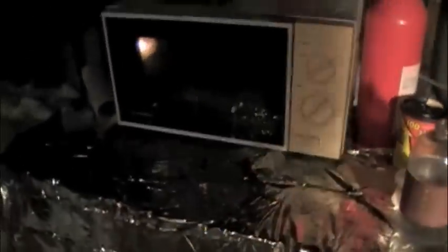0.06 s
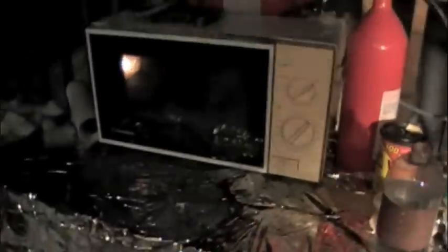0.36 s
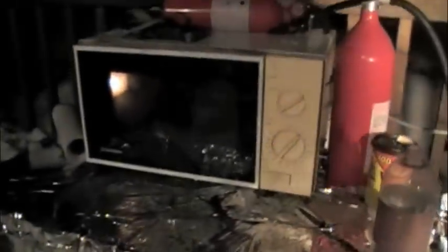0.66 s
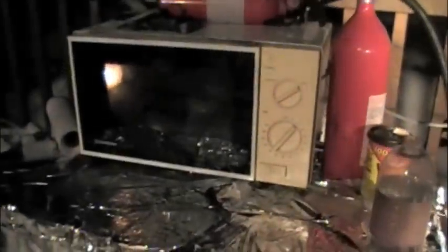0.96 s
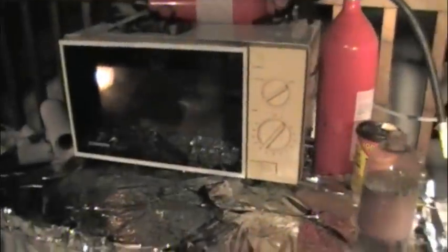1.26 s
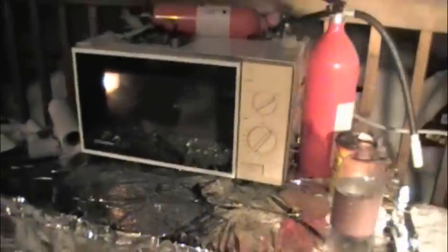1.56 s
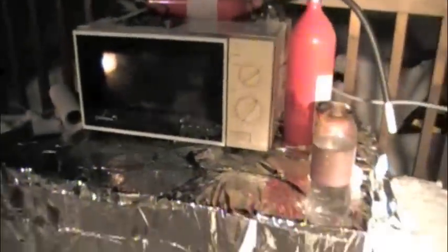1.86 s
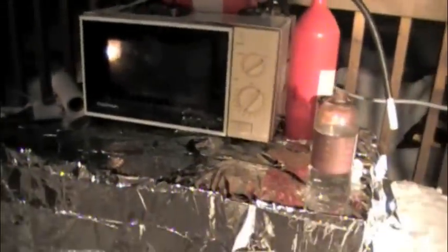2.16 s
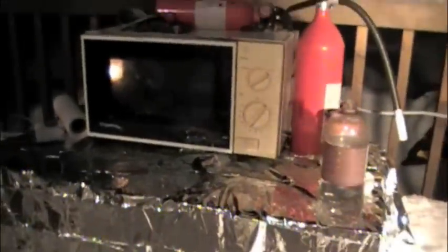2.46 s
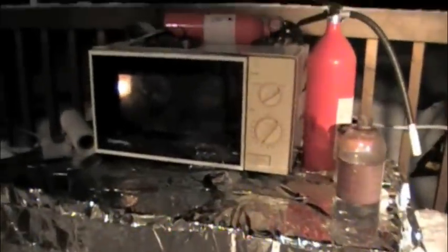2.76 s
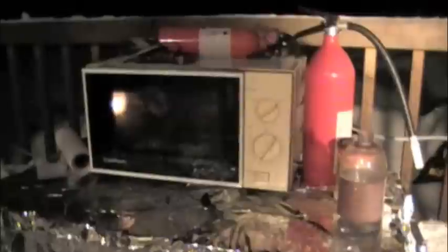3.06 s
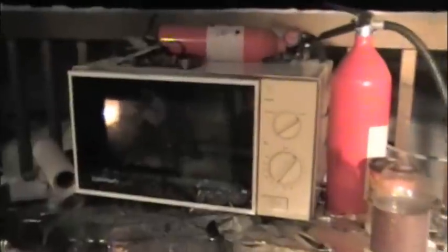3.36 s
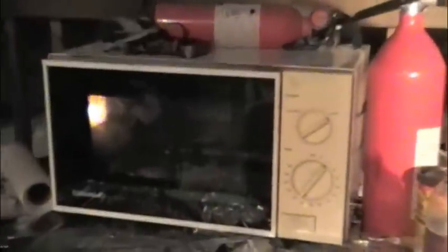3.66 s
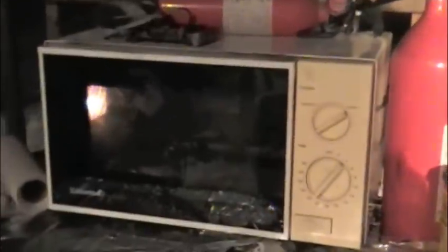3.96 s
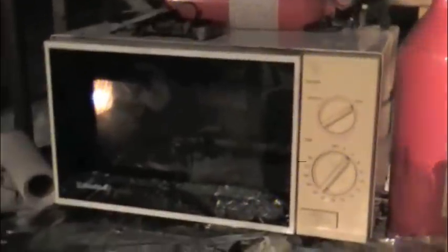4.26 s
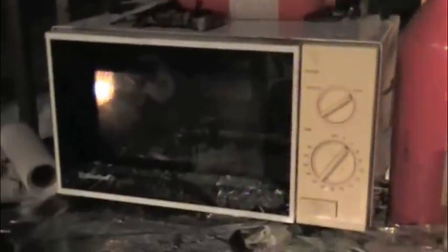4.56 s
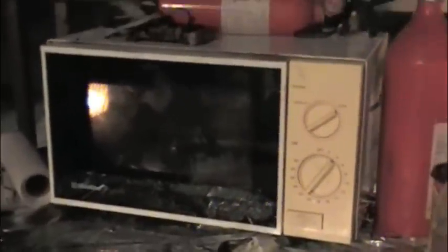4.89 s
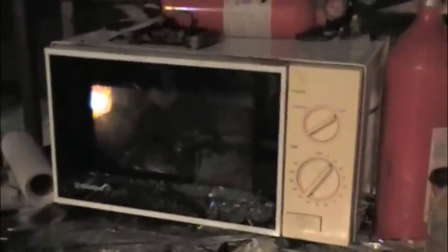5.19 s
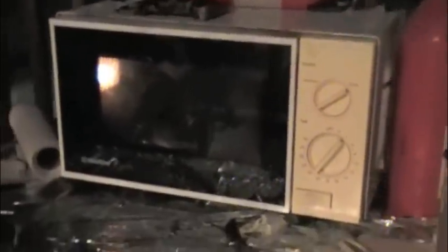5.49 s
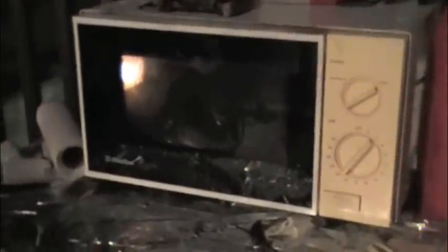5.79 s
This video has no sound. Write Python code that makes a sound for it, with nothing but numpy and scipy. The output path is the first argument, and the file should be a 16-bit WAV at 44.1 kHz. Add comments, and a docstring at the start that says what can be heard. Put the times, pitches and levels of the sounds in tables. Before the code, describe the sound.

A microwave oven runs close by in a small room for six seconds, with a steady low mains hum, an airy fan rush and a very faint whine. Right at the start, a few short electric sparks spit inside it, followed by a puff of hiss and light crackles of burning plastic. From about 0.9 to 2.6 seconds, arcing sizzles in buzzing, slightly metallic spells, with a cluster of sharp cracks and a ping at 1.2. Brief sparks flare between 2.8 and 3.2, while a faint squeal rises and falls. More sizzling comes at 3.5, ending in a bright snap at 3.8, and returns from 4.2 to 4.7. Cracks and hollow knocks gather from 4.9, building to the loudest, densest pops, crackles and pings between 5.5 and 5.8, then die back to the hum.

```python
"""Phone burning in a microwave oven

An old oven hums at mains harmonics; its fan whines and blows air through the vents.
An arc pulses with the magnetron at mains rate, hisses, flares and rings in the steel cavity.
The burning casing crackles, puffs, knocks, cracks, pings and faintly squeals in a small room,
most violently near the end."""
import sys
import numpy as np
from scipy import signal
from scipy.fft import rfft, irfft, next_fast_len
from scipy.io import wavfile
from scipy.ndimage import uniform_filter1d, map_coordinates

SR = 44100
rng = np.random.default_rng(int(sys.argv[2]) if len(sys.argv) > 2 else 0)


def unload_audio(sound):
    """Save the sound as a 16-bit wav file, at the path given as the first command line argument."""
    columns = np.transpose(np.atleast_2d(sound))
    # keep every value between -1 and 1, then stretch to whole-number steps
    steps = np.round(np.clip(columns, -1, 1) * 32767)
    wavfile.write(sys.argv[1], SR, steps.astype(np.int16))


N = 266143
TIME_S = np.arange(N) / SR
COARSE_S = TIME_S[::32]

# Oven loudness as the listener moves. Each row: time in seconds, relative hum and fan rumble in dB.
OVEN_LEVELS = [(0, -55, -55), (.8, -54, -61), (1.5, -54, -56), (2.1, -53.5, -65.5), (3.1, -53, -60),
               (3.6, -54.5, -61.5), (4.2, -54, -61.5), (4.8, -53, -61), (5.3, -52, -58.5), (6, -51, -57)]
# Transformer and panel hum. Each row: mains harmonic number, relative level in dB.
HUM_PARTIALS = [(1, -41.5), (2, -17.5), (3, -26.5), (4, -21), (6, -16), (8, -2.5), (10, -23), (12, -12),
                (14, -28), (18, -21), (26, -19.5)]
# Hum partials that form standing waves. Each entry: mains harmonic number.
STANDING_HARMONICS = [2, 4, 6, 12]
# Path through the standing waves. Each row: time in seconds, then gain in dB of each such harmonic.
STANDING_GAINS = [(0, -2, 7, 6, -5), (.9, 0.5, 12, 8.5, -4), (1.45, 3, 7.5, 7, -2), (2, -1, -2.5, -4, 0.5),
                  (3, 1.5, -4, -7, -1.5), (3.6, 4, 4, -16, -5), (4.3, 1, 0, 3.5, 0), (5.1, -1, -2, -2, 3),
                  (5.65, -4.5, 5, 4, 5), (6.03, -4, -2, 0, 1)]
# Fan rumble and vent air spectra. Each row: frequency in Hz, gain in dB.
RUMBLE_SPECTRUM = [(25, -57), (55, -41), (100, -14), (170, -12), (228, -0.5), (290, -5), (370, 0.5),
                   (470, -11.5), (800, -13), (1600, -41.5)]
AIR_SPECTRUM = [(30, -62), (100, -25), (250, -5.5), (420, 2.5), (680, 0.5), (950, -2.5), (1550, -5.5),
                (2000, -8.5), (2550, -7), (3000, -13), (4200, -13), (6500, -17.5), (8600, -19.5),
                (11000, -27), (16000, -55)]
# Vent resonances. Each row: centre in Hz, width in Hz, relative height in dB.
VENT_MODES = [(632, 19, 7.5), (832, 77, 7.5), (1200, 12, -13), (1467, 33, 12.5), (1840, 110, -6),
              (2080, 35, -30)]
# Stereo likeness of the fan noise. Each row: frequency in Hz, coherence from 0 to 1.
FAN_COHERENCE = [(60, 0.17), (150, 0.53), (380, 0.79), (950, 0.46), (2380, 0.58), (5980, 0.69),
                 (15000, 0.16)]
# Spells of arcing. Each row: start and end in seconds, relative level in dB, rise in seconds, sag in
# dB per second, treble, mains pulsing and frying pops in dB, low, middle and top ring in Hz,
# the three ring gains in dB, notch in Hz.
ARC_SPELLS = [(0.855, 1.07, -40.5, 0.0086, 34, 5, 5.5, 14, 1760, 2760, 7250, 1, 0, -8, 3200),
              (1.123, 1.43, -46.5, .016, 46, 1.5, 8, 21, 1820, 7300, 8400, -1, -6, -6, 6400),
              (1.423, 1.857, -47.5, .23, 30, 3, 4.5, 20.5, 1760, 5000, 8100, -14, -2, -3, 6500),
              (1.861, 2.6, -51.5, .01, 28.5, 1.5, 7, 26.5, 1800, 6000, 9200, -12, -15, -9, 7160),
              (3.498, 3.757, -50, .004, 10, 5.5, 7, 18, 1800, 7350, 8800, -5, 0, -7, 6700),
              (3.511, 3.76, -49, 0.1, 60, 6, 8, 17, 2090, 5900, 8800, 6, 2, 6, 3080),
              (4.202, 4.653, -45.5, .11, 25, -1.5, 5, 21, 1850, 2200, 8200, -2, -5, -17, 3230),
              (4.694, 5.137, -56, .01, -16, -1.5, 12, 18, 1800, 5200, 8400, -16, -19, -12, 7000)]
# Sudden arc flares. Each row: start in seconds, relative level and treble in dB, low, middle and top
# ring in Hz, the three ring gains in dB, notch in Hz.
ARC_FLARES = [(.002, -30.5, -11, 1800, 5750, 8300, -5, -5, -5.5, 4200),
              (0.0791, -28, 3, 1840, 5600, 8600, 6.5, 1, -3, 4250),
              (0.0963, -27.5, 1.5, 2030, 7200, 8300, -1, 0, -13, 4200),
              (.163, -31, 2.5, 1900, 6300, 8650, -6, -4, -1, 4750),
              (1.064, -35, -1.5, 1730, 5800, 8300, -3, -4, -8, 3250),
              (1.1128, -35, -1, 1750, 7400, 8400, -4, -2, -9, 6400),
              (1.78, -34, -2, 1750, 7740, 8400, -4, -5, -11, 6400),
              (2.381, -37.5, -1, 1830, 5850, 6900, 1, 4, -10, 8400),
              (2.7977, -24.5, -14.5, 1780, 4460, 8100, 1, -16, 9.5, 3200),
              (2.828, -33.5, -1.5, 1770, 7500, 8500, 1, -4, 0, 3200),
              (2.93, -27.5, 2, 1800, 2850, 8800, -2, -1, -3, 6940),
              (3.2132, -26.5, -6.5, 1750, 5500, 8700, 6.5, 0, 5, 7000)]
# Arc hiss spectrum. Each row: frequency in Hz, gain in dB.
HISS_SPECTRUM = [(30, -43), (100, -17), (500, -4), (850, -12), (1150, -2), (2300, -4), (3300, -7),
                 (5500, -2.5), (8800, -1.5), (10000, -8.5), (12500, -14.5), (14000, -20), (16000, -44)]
# Steel cavity resonances. Each row: centre in Hz, width in Hz, relative height in dB.
CAVITY_MODES = [(1020, 93, 4.5), (1217, 65, 3), (1466, 62, 2.5), (1756, 165, 6.5), (2117, 85, 3.5),
                (2680, 190, -1.5), (5680, 560, -14), (8170, 630, -13)]
# Cavity reverberation. Each row: frequency in Hz, T60 in seconds.
CAVITY_DECAY = [(500, 0.12), (2000, 0.13), (8000, 0.11), (14000, 0.061)]
# Crackle spectrum of burning plastic. Each row: frequency in Hz, gain in dB.
PLASTIC_SPECTRUM = [(30, -54), (80, -12), (250, -16.5), (550, -0.5), (1000, 1), (2000, 1), (2700, -5),
                    (5000, -10), (8500, -8.5), (12000, -16), (16000, -59)]
# Dull smouldering. Each row: time in seconds, relative level in dB.
SMOULDER_LEVELS = [(.2, -55), (.52, -54.5), (.95, -59.5), (1.6, -51.5), (2.05, -68), (4.3, -78),
                   (4.85, -55.5), (6, -57)]
# Crackle flurries. Each row: peak time in seconds, relative level in dB, length in seconds, treble in dB.
CRACKLE_FLURRIES = [(0.236, -43.5, 0.03, 3), (0.29, -56, 0.14, 0), (0.315, -44.5, 0.073, -3),
                    (1.439, -48.5, 0.04, -3), (1.544, -47, 0.16, -1.5), (1.714, -45, 0.14, -11),
                    (4.373, -52, 0.057, -11), (4.958, -40.5, 0.059, -15), (4.996, -37.5, 0.02, 0),
                    (5.264, -53.5, 0.22, 4.5), (5.3, -43.5, 0.014, 6), (5.44, -49, 0.081, 3),
                    (5.534, -33, 0.07, -0.5), (5.55, -31.5, 0.048, 2.5), (5.594, -34, 0.056, -1.5),
                    (5.699, -31, 0.028, -13), (5.759, -44, 0.11, -5.5)]
# Gas jets. Each row: start and length in seconds, level in dB, low and high edge in Hz.
GAS_PUFFS = [(0.228, 0.091, -43, 590, 5260), (4.285, 0.072, -58, 1500, 3200)]
# Hollow knocks. Each row: start in seconds, relative peak in dB, pitch in Hz, T60 in seconds.
KNOCKS = [(.239, -52, 107, .1), (.318, -54, 196, .1), (0.367, -40, 163, .1), (1.17, -28, 680, .06),
          (1.177, -31, 600, .04), (1.435, -49.5, 148, .1), (1.494, -50, 92, .14), (2.8, -44.5, 148, 0.091),
          (2.8, -37, 510, 0.073), (4.943, -33, 900, .04), (4.97, -34, 750, .08), (5.198, -38, 271, 0.087),
          (5.2, -26.5, 800, 0.071), (5.222, -34, 835, 0.065), (5.5392, -25, 900, 0.018),
          (5.547, -36, 514, .08), (5.552, -26, 910, .02), (5.554, -46, 134, .1), (5.604, -32, 900, .03),
          (5.683, -25.5, 720, 0.045), (5.692, -20.5, 790, 0.044), (5.696, -35.5, 343, 0.11),
          (5.701, -32, 514, 0.11), (5.741, -27, 460, 0.094), (5.776, -33.5, 530, 0.061)]
# Casing cracks. Each row: start in seconds, relative level in dB, tilt in dB per octave,
# jolt as a ratio to the tearing, rattle in dB.
CASING_CRACKS = [(.3069, -42, -0.5, 5.3, -21), (0.3138, -39.5, -3.5, 14, -14),
                 (0.3218, -38.5, -1.5, 3.6, -20), (0.4428, -42, 6, 2.4, -25), (.4573, -55, -3, 4.5, -14),
                 (0.6383, -45.5, -2.5, 4.5, -9), (0.7495, -44.5, -2.5, 5, -4),
                 (1.168, -32.5, -1.5, 6.5, -4), (1.177, -28, -2, 11, -11), (1.181, -33.5, -5.5, 8.2, -12),
                 (1.196, -34.5, -1.5, 7, -11), (1.1992, -31, -2, 11, -10), (1.2198, -37.5, 0, 4.4, -10),
                 (1.284, -53, 3, 4, -12), (1.3032, -46.5, -4.5, 4.4, -8), (1.384, -36.5, -1.5, 3, -19),
                 (1.488, -41.5, 0.5, 10, -18), (1.491, -43, -2, 4.8, 3.5), (1.435, -54, 4.5, 4, -8),
                 (1.651, -52, -2, 3.7, -14), (1.663, -43.5, 1.5, 3, -12), (1.726, -47, 0, 5.8, -16),
                 (1.906, -47.5, 8, 3.8, -20), (2.1574, -45, -2.5, 4.4, -20), (2.1835, -53, -2, 6, -18),
                 (2.244, -65, 8.5, 5, -16), (2.7778, -60.5, 12, 5, 2), (2.7976, -55, -9.5, 6, -17),
                 (3.214, -49, -7.5, 4.2, 1), (3.773, -35.5, 4.5, 1.9, -26), (3.7758, -37, 2, 3.9, -28),
                 (4.194, -55, 0, 4, -5), (4.38, -45, 1.5, 5, -20), (4.439, -51, 0, 6, -18),
                 (4.821, -55, -2, 5, -16), (4.928, -47, -4, 6, -16), (4.905, -47, -2, 6, -14),
                 (4.9428, -34.5, -5, 6.6, -12), (4.9554, -36, -0.5, 6.2, -3), (4.97, -31, -3, 4.7, -4.5),
                 (4.972, -35, -3.5, 5.9, -11), (5.002, -37, -2, 4.2, -10), (5.035, -47.5, 1, 4.4, -6),
                 (5.114, -53.5, 6, 5, -9), (5.1953, -43, 6, 3.3, -10), (5.198, -53.5, 13.5, 4.6, -14),
                 (5.2152, -51.5, 11, 2, 9.5), (5.235, -53, 8.5, 4.4, -18), (5.2705, -45.5, -6.5, 7.8, -20),
                 (5.2924, -42.5, 3, 5.4, -5), (5.3249, -42, 1.5, 3, -6), (5.341, -63, 6, 5, -9),
                 (5.3654, -44.5, 6, 6, -7), (5.3679, -40.5, -2, 6, -4), (5.408, -37, 2, 9.1, -11),
                 (5.426, -50, 8, 6, -12), (5.4613, -27.5, 1, 15, -10), (5.4981, -25, 1, 10, -13),
                 (5.5, -29.5, -2, 4, -2), (5.5122, -22, 1, 15, -12), (5.5208, -30, 0, 14, -22),
                 (5.539, -26, 1.5, 6.5, -13), (5.552, -24.5, -1, 11, -9), (5.561, -39, 8.5, 6, -11),
                 (5.582, -29, 3.5, 2.4, -4), (5.592, -41, -9.5, 6, -9), (5.6043, -35.5, -2, 5.7, -5),
                 (5.611, -37, 0, 6, -11), (5.6711, -35, 2.5, 7, -15), (5.6838, -39, 1, 4, -14),
                 (5.6912, -25.5, -1, 2.4, -12), (5.6945, -25.5, -1.5, 2.6, -24),
                 (5.7408, -28, -2, 3.8, -11), (5.9615, -49, 0, 4.4, -14)]
# Bands of a crack. Each row: low and high edge in Hz, gain in dB.
CRACK_SPECTRUM = [(379, 1254, 9), (1100, 2285, 20.5), (3010, 5560, 16.5), (6250, 10900, 12),
                  (12800, 14400, -5)]
# Casing resonances. Each row: centre in Hz, width in Hz, relative height in dB.
CASING_MODES = [(670, 114, -2), (1055, 210, 0), (1574, 30, -13), (2050, 120, -13.5), (2870, 130, -5),
                (3920, 430, -6), (4850, 94, -14), (7170, 420, -4.5), (7940, 420, 0), (8800, 890, -3.5)]
# Bursting blisters. Each row: start in seconds, relative level in dB, pitch in Hz.
BLISTER_PINGS = [(0.637, -37, 5000), (1.169, -19.5, 2430), (1.49, -33.5, 4370), (1.563, -31, 1160),
                 (3.281, -33.5, 1380), (2.185, -43, 3030), (3.773, -26, 2710), (3.774, -27.5, 2250),
                 (3.775, -31, 4430), (5.4985, -16, 1980), (5.693, -20.5, 4600), (5.6925, -26, 6500),
                 (5.5125, -16.5, 2100), (5.7409, -14.5, 1585)]
# Course of the squeal. Each row: time in seconds, pitch in Hz, level in dB.
SQUEAL_PATH = [(2.55, 1450, -71), (2.72, 1584, -57), (2.86, 1740, -65), (3.05, 1650, -60),
               (3.25, 1452, -61), (3.29, 1368, -58), (3.35, 1238, -54), (3.4, 1150, -59.5),
               (3.47, 1080, -79)]
# Feed to the room reverberation. Each row: frequency in Hz, gain in dB.
ROOM_SEND = [(100, -15), (300, -9), (650, -6), (1100, -7.5), (2300, -11), (4000, -7), (12000, -11.5)]
# Room reverberation. Each row: frequency in Hz, T60 in seconds.
ROOM_DECAY = [(150, 0.41), (700, 0.11), (2500, 0.042), (8000, 0.062), (14000, 0.11)]
# Phase skew at each microphone port. Each row: frequency in Hz, depth for casing and for arc in radians.
PORT_SKEW = [(500, 0.081, .1), (1480, 0.21, 0.097), (3200, 0.37, 0.048), (5560, 0.29, 0.069),
             (8700, 0.7, 0.57), (11400, 0.6, 0.11)]
# Channel balance. Each row: frequency in Hz, left minus right in dB.
CHANNEL_BALANCE = [(120, -2.5), (600, -0.5), (1400, 0.2), (5000, -1.3), (14000, -0.2)]

MAINS_HZ = 60


def amp(db):
    """Decibels to gain."""
    return 10 ** (np.asarray(db) / 20)


def unit(x):
    """Scale to rms 1."""
    return x / np.sqrt(np.mean(x ** 2) + 1e-20)


def along(points, hz):
    """Read (Hz, value) points on a log axis."""
    knots_hz, values = np.transpose(points)
    return np.interp(np.log(hz + 1), np.log(knots_hz + 1), values)


def curves(rows):
    """Per-sample curve for each column after the time."""
    times_s, *columns = np.transpose(rows)
    return [np.interp(TIME_S, times_s, column) for column in columns]


def wobble(rate_hz):
    """Smooth random curve."""
    return map_coordinates(rng.standard_normal(int(N * rate_hz / SR) + 4), [TIME_S * rate_hz])


def add(track, start_s, sound):
    """Mix a sound into a track."""
    part = track[..., max(0, round(start_s * SR)):][..., :sound.shape[-1]]
    part += sound[..., :part.shape[-1]]


def coloured(x, gain):
    """Minimum-phase filter of magnitude gain(hz)."""
    size = 2 * next_fast_len(N // 2 + SR // 4)
    hz = np.fft.rfftfreq(size, 1 / SR)
    cepstrum = irfft(np.log(np.maximum(gain(hz), 1e-6)), size)
    cepstrum[1:size // 2] *= 2
    cepstrum[size // 2 + 1:] = 0
    return irfft(rfft(x, size) * np.exp(rfft(cepstrum)), size)[..., :N]


def bandpass(x, edges_hz, order=3):
    """Butterworth band-pass."""
    return signal.sosfilt(signal.butter(order, edges_hz, "band", fs=SR, output="sos"), x)


def tilted(x, treble_db, split_hz=3300):
    """Set the treble against the body."""
    body = signal.sosfilt(signal.butter(2, split_hz, fs=SR, output="sos"), x)
    treble = signal.sosfilt(signal.butter(2, split_hz, "high", fs=SR, output="sos"), x)
    return body - amp(treble_db) * treble


def humps(modes, hz, lift_db=0):
    """Gain of resonances above a flat response."""
    peaks = sum(amp(db) / (1 + (2 * (hz - centre_hz) / width_hz) ** 2)
                for centre_hz, width_hz, db in modes)
    return 1 + amp(lift_db) * peaks


def pair(mid, side):
    """Mid and side to left and right."""
    return np.array([mid + side, mid - side])


def rush(gain):
    """Partly coherent stereo air noise, rms 1."""
    def spread_rad(hz):
        return np.arccos(along(FAN_COHERENCE, hz)) / 2
    mid = coloured(rng.standard_normal(N), lambda hz: gain(hz) * np.cos(spread_rad(hz)))
    side = coloured(rng.standard_normal(N), lambda hz: gain(hz) * np.sin(spread_rad(hz)))
    return unit(pair(mid, side))


def oven(whine_hz=2183, whine_db=-65, wander_rad=0.46, air_db=-54.5):
    """Transformer and panels hum; the fan whines, rumbles and drives air through the vents."""
    hum_db, rumble_db = curves(OVEN_LEVELS)
    standing_db = dict(zip(STANDING_HARMONICS, curves(STANDING_GAINS)))
    hum = np.zeros(N)
    for harmonic, db in HUM_PARTIALS:
        level = amp(db + standing_db.get(harmonic, 0) + 0.6 * wobble(2))
        hum += level * np.sin(2 * np.pi * (harmonic * MAINS_HZ * TIME_S + rng.random()))
    whine_level = amp(whine_db + 1.1 * wobble(5))
    whine = whine_level * np.sin(2 * np.pi * whine_hz * TIME_S + wander_rad * wobble(11))
    rumble = amp(rumble_db - 1.66) * rush(lambda hz: amp(along(RUMBLE_SPECTRUM, hz)))
    air = rush(lambda hz: amp(along(AIR_SPECTRUM, hz)) * humps(VENT_MODES, hz, lift_db=-8.5))
    return np.sqrt(2) * amp(hum_db) * hum + whine + rumble + amp(air_db) * air


def ringing(x, low_hz, middle_hz, top_hz, low_db, middle_db, top_db, notch_hz):
    """The arc's position favours three resonances and partly cancels one band."""
    def band(hz, q):
        return signal.lfilter(*signal.iirpeak(hz, q, fs=SR), x)
    modes = [(low_hz, low_db), (middle_hz, middle_db), (top_hz, top_db)]
    rings = sum(amp(db) * band(hz, q=10.2) for hz, db in modes)
    return x + rings - 0.45 * band(notch_hz, q=18)


def arc_flares(attack_s=0.0014, t60_s=0.06):
    """The arc flares in brief bursts of noise."""
    out, t = np.zeros(N), np.arange(SR // 10) / SR
    for start_s, db, treble_db, *rings in ARC_FLARES:
        envelope = amp(db - 60 * t / t60_s) * (1 - np.exp(-t / attack_s))
        spark = envelope * rng.standard_normal(len(t))
        add(out, start_s, ringing(tilted(spark, treble_db), *rings))
    return out


def spell_envelope(start_s, end_s, db, rise_s, sag_db_per_s, climb_db=18.5, quench_db_per_s=450):
    """A spell of arcing climbs, sags as metal burns away, and is quenched."""
    age_s = COARSE_S - start_s
    level_db = db + climb_db * np.minimum(age_s / rise_s - 1, 0)
    level_db -= sag_db_per_s * np.maximum(age_s - rise_s, 0)
    level_db -= quench_db_per_s * np.maximum(COARSE_S - end_s, 0)
    return np.interp(TIME_S, COARSE_S, amp(np.maximum(level_db - 2, -200)))


def arc_spells(fire_s=0.0136, pops_per_s=45):
    """The arc fires and fades each mains cycle, sputters and fries the melt."""
    firing = uniform_filter1d(1 - 2 * ((TIME_S - fire_s) * MAINS_HZ % 1), size=88)
    sputter_db = 1.5 * wobble(1200) + 1.57 * wobble(70)
    pops = (rng.random(N) < pops_per_s / SR) * rng.standard_normal(N)
    out = np.zeros(N)
    for start_s, end_s, db, rise_s, sag_db_per_s, treble_db, pulse_db, pop_db, *rings in ARC_SPELLS:
        hiss = unit(amp(sputter_db + pulse_db * firing) * rng.standard_normal(N))
        spark = spell_envelope(start_s, end_s, db, rise_s, sag_db_per_s) * (hiss + amp(pop_db) * pops)
        out += ringing(tilted(spark, treble_db), *rings)
    return out


def arc():
    """Spells and flares resonate and reverberate in the steel cavity."""
    sparks = arc_spells() + arc_flares()
    direct = coloured(sparks, lambda hz: amp(along(HISS_SPECTRUM, hz)) * humps(CAVITY_MODES, hz))
    return 0.88 * direct + 0.63 * wandering_echo(direct, CAVITY_DECAY, side_db=-11)


def flurry_db(peak_s, db, length_s, rise_db=39, fall_db=21):
    """Level of a flurry: quick climb, slower fall."""
    lengths = (COARSE_S - peak_s) / length_s
    return db + np.minimum(rise_db * lengths, -fall_db * lengths)


def blend(noise, swells):
    """Shape noise by (level curve in dB, treble in dB) swells; powers add."""
    body_power = sum(amp(2 * db) for db, _ in swells) + 1e-20
    treble_power = sum(amp(2 * (db + treble_db)) for db, treble_db in swells) + 1e-20
    level = np.interp(TIME_S, COARSE_S, np.sqrt(body_power))
    tilt_db = np.interp(TIME_S, COARSE_S, 10 * np.log10(treble_power / body_power))
    return tilted(noise * level, tilt_db)


def crackle(grains_per_s=5000, spread_db=3.5, smoulder_treble_db=-9.5, wake_treble_db=-2):
    """Tiny bursts in burning plastic: a smoulder, flurries and a wake after each crack."""
    present = rng.random(N) < grains_per_s / SR
    sizes = amp(spread_db * np.minimum(rng.exponential(size=N), 3.5)) * rng.choice([-1, 1], N)
    grains = coloured(present * sizes, lambda hz: amp(along(PLASTIC_SPECTRUM, hz)))
    swells = [(np.interp(COARSE_S, *np.transpose(SMOULDER_LEVELS)), smoulder_treble_db)]
    swells += [(flurry_db(*shape), treble_db) for *shape, treble_db in CRACKLE_FLURRIES]
    for start_s, db, _, _, rattle_db in CASING_CRACKS:
        wake_db = flurry_db(start_s, db + rattle_db - 1.5, length_s=0.038)
        swells.append((np.where(COARSE_S < start_s, -np.inf, wake_db), wake_treble_db))
    return blend(unit(grains), swells)


def puffs(attack_s=0.0016, t60_s=0.044):
    """Gas leaves the melt in short, even jets."""
    out, t = np.zeros(N), np.arange(SR // 3) / SR
    for start_s, length_s, db, *edges_hz in GAS_PUFFS:
        envelope = (1 - np.exp(-t / attack_s)) * amp(db - 60 * np.maximum(t - length_s, 0) / t60_s)
        jet = unit(bandpass(rng.standard_normal(len(t)), edges_hz, order=2))
        add(out, start_s, envelope * jet)
    return out


def knocks(jolt=13.3):
    """Dull knocks: one push, then a brief rumble."""
    out, t = np.zeros(N), np.arange(SR // 4) / SR
    for start_s, db, hz, t60_s in KNOCKS:
        force = rng.standard_normal(len(t)) * amp(-60 * t / t60_s)
        force[0] += jolt
        knock = bandpass(force, [hz * 0.69, hz * 1.55])
        add(out, start_s, amp(db - 1) * knock / np.abs(knock).max())
    return out


def cracks(tear_s=0.0014, rattle_t60_s=0.057, pivot_hz=2560):
    """The casing cracks: a jolt, brief tearing, a short rattle."""
    out, t = np.zeros(N), np.arange(SR // 12) / SR
    for start_s, db, tilt_db_per_octave, jolt, rattle_db in CASING_CRACKS:
        envelope = np.exp(-t / tear_s) + amp(rattle_db - 60 * t / rattle_t60_s)
        force = envelope * rng.standard_normal(len(t))
        force[0] -= jolt
        for low_hz, high_hz, band_db in CRACK_SPECTRUM:
            band = bandpass(force, [low_hz, high_hz])
            octaves = np.log2(np.sqrt(low_hz * high_hz) / pivot_hz)
            gain = amp(db + band_db + tilt_db_per_octave * octaves)
            add(out, start_s, gain * band / np.linalg.norm(band))
    return coloured(out, lambda hz: humps(CASING_MODES, hz, lift_db=3.5))


def pings(attack_s=0.00012, t60_s=0.018):
    """Blisters burst and ring briefly on one note."""
    out, t = np.zeros(N), np.arange(SR // 15) / SR
    for start_s, db, hz in BLISTER_PINGS:
        envelope = amp(db - 60 * t / t60_s) * (1 - np.exp(-t / attack_s))
        add(out, start_s, envelope * np.sin(2 * np.pi * hz * t))
    return bandpass(out, [600, 12000], order=2)


def squeal(width_hz=520):
    """Faint narrow-band noise rises, then falls in pitch, as of gas forced from the melt."""
    hz, db = curves(SQUEAL_PATH)
    phase = 2 * np.pi * np.cumsum(hz) / SR
    return amp(db) * (wobble(width_hz) * np.sin(phase) + wobble(width_hz) * np.cos(phase))


def echo(x, decay, side_db):
    """Diffuse stereo reverberation; T60 varies with frequency."""
    hz, t, spectra = signal.stft(rng.standard_normal((2, SR // 4)), SR, nperseg=128)
    fade = amp(-60 * t / along(decay, hz)[:, None])
    _, tail = signal.istft(spectra * fade, SR, nperseg=128)
    mid, side = signal.fftconvolve(x[None], tail / np.linalg.norm(tail[0]), axes=1)[:, :len(x)]
    return pair(mid, amp(side_db) * side)


def wandering_echo(x, decay, side_db, block=10240):
    """The echo pattern keeps changing as the listener moves."""
    out, window, hop = np.zeros((2, N)), signal.windows.cosine(block), block // 2
    padded = np.pad(x, (hop, block))
    for i in range(0, N, hop):
        piece = np.pad(padded[i:i + block] * window, (0, block))
        wet = echo(piece, decay, side_db)
        add(out, (i - hop) / SR, wet[:, max(0, hop - i):])
    return out


def ports(x, depths, bounce_s=0.0011):
    """Short waves bounce off the microphone housing and reach its two ports out of step."""
    size = next_fast_len(N + SR // 4)
    hz = np.fft.rfftfreq(size, 1 / SR)
    skew_rad = along(depths, hz) * np.sin(2 * np.pi * hz * bounce_s)
    return irfft(rfft(x, size) * np.exp(1j * pair(0, skew_rad)), size)[:, :N]


def scene():
    """Oven, arc and burning casing in a small room with a hollow low ring."""
    burning = cracks() + crackle() + pings() + puffs() + knocks() + squeal()
    send = coloured(burning, lambda hz: amp(along(ROOM_SEND, hz)))
    room = wandering_echo(send, ROOM_DECAY, side_db=-14.5)
    casing_skew = [(hz, rad) for hz, rad, _ in PORT_SKEW]
    arc_skew = [(hz, rad) for hz, _, rad in PORT_SKEW]
    return oven() + ports(burning + room, casing_skew) + ports(arc(), arc_skew)


def record(dry):
    """Slight channel imbalance and a hard band limit."""
    top_hz = 16300
    size = next_fast_len(N + SR // 4)
    hz = np.fft.rfftfreq(size, 1 / SR)
    balance = amp(pair(0, along(CHANNEL_BALANCE, hz) / 2))
    return irfft(rfft(dry, size) * balance * (hz < top_hz), size)[:, :N]


dry = scene()
out = record(dry)
unload_audio(out)
```